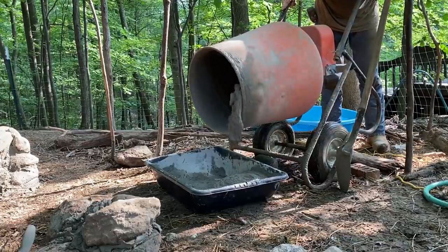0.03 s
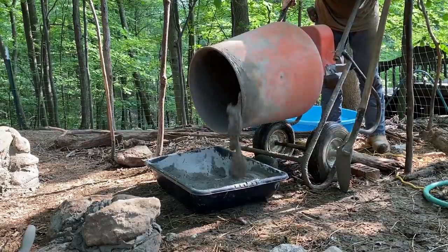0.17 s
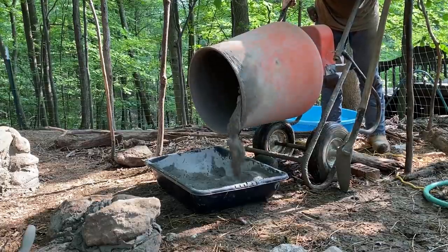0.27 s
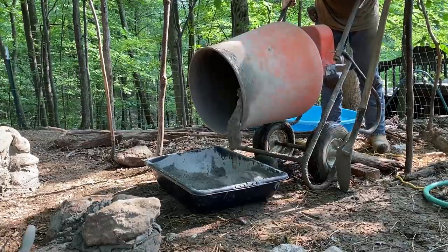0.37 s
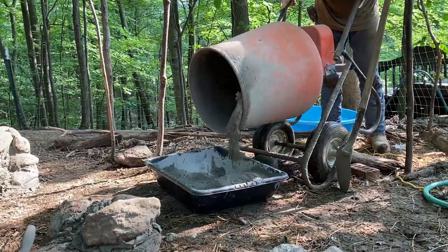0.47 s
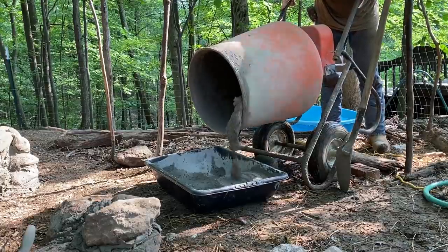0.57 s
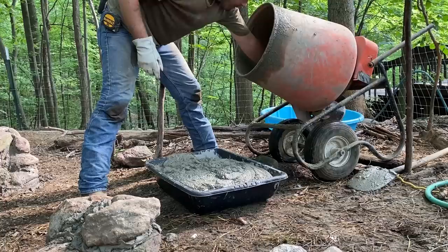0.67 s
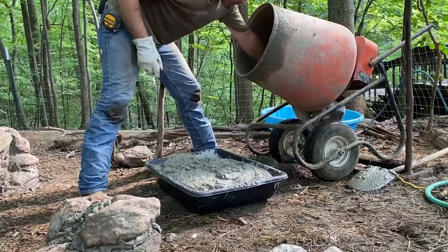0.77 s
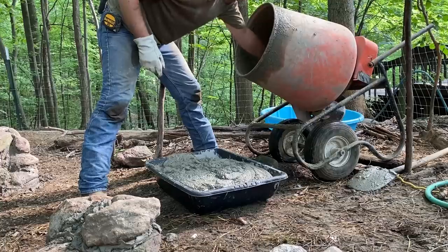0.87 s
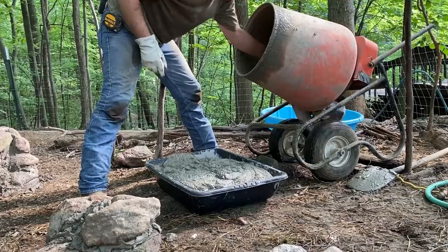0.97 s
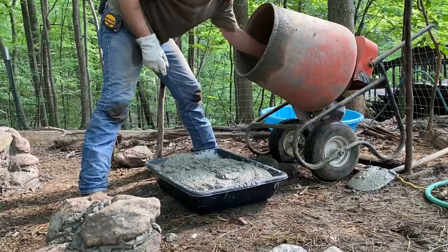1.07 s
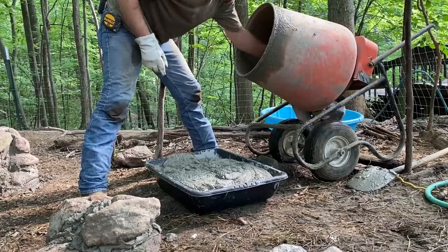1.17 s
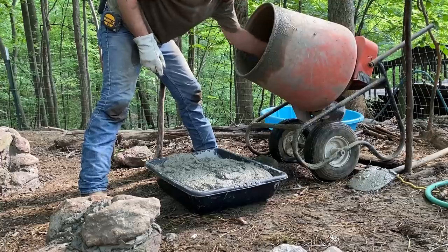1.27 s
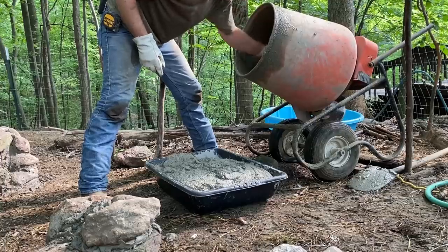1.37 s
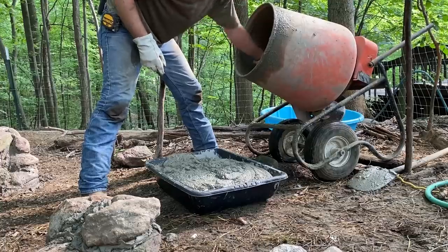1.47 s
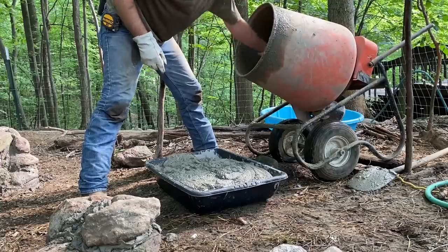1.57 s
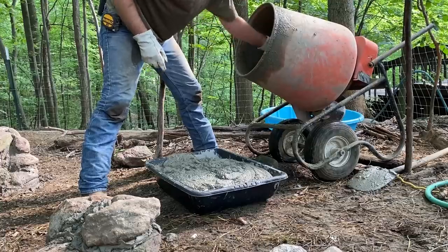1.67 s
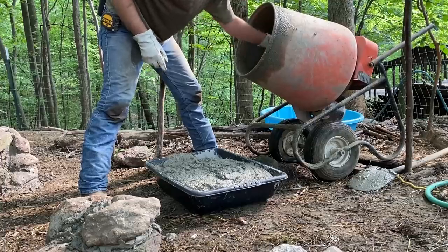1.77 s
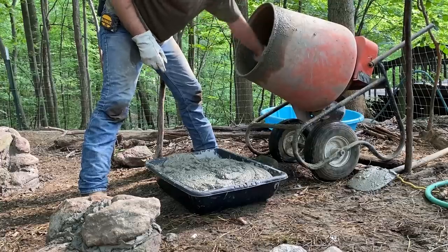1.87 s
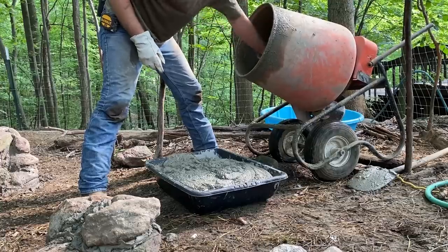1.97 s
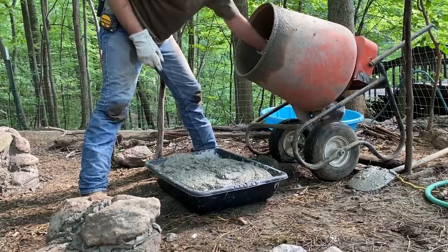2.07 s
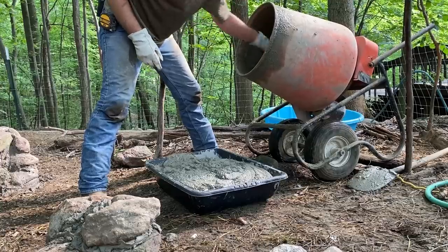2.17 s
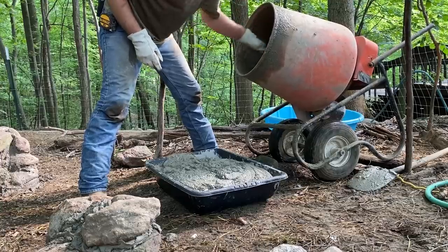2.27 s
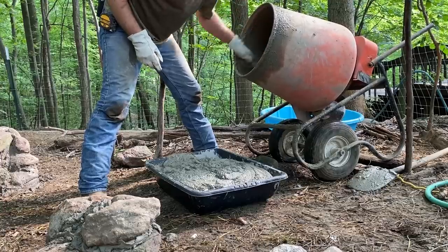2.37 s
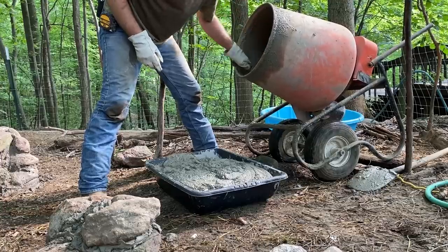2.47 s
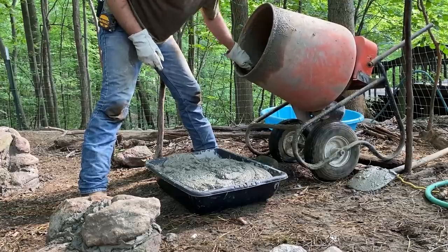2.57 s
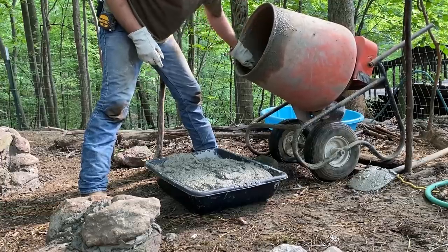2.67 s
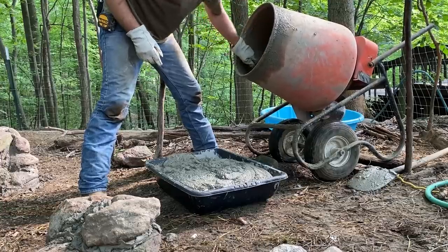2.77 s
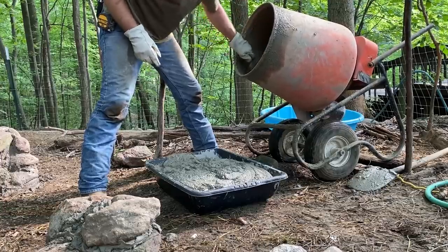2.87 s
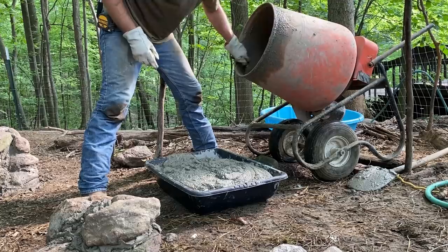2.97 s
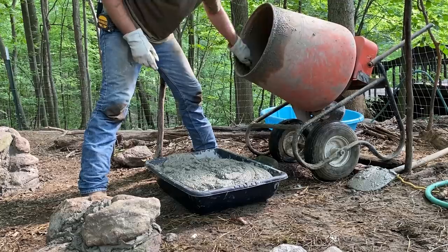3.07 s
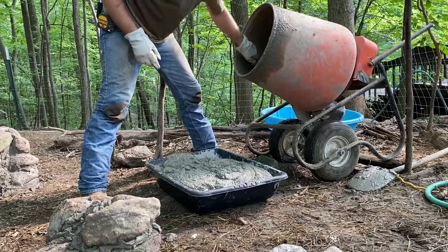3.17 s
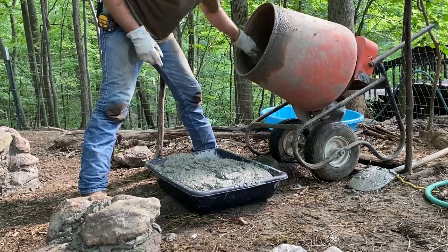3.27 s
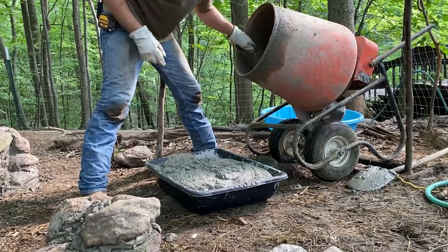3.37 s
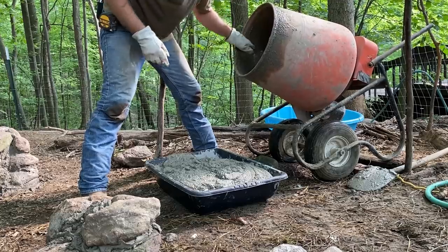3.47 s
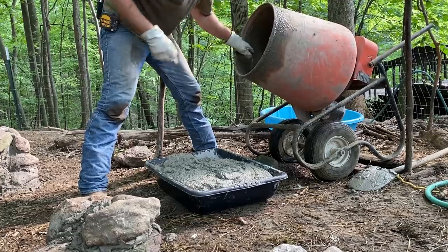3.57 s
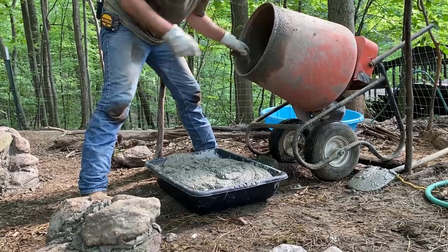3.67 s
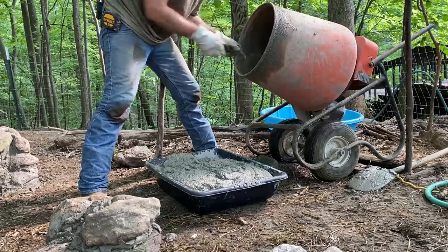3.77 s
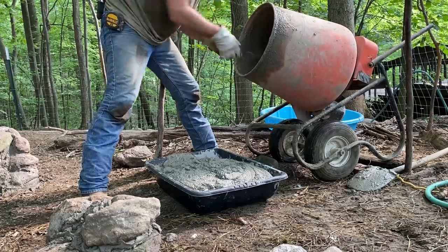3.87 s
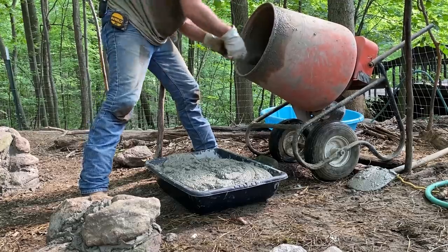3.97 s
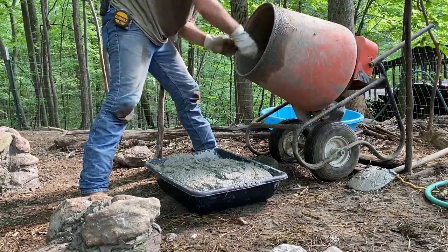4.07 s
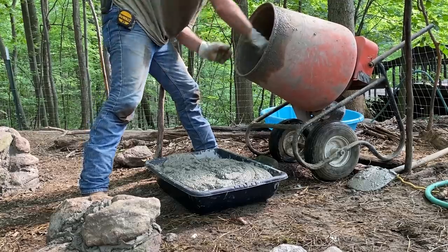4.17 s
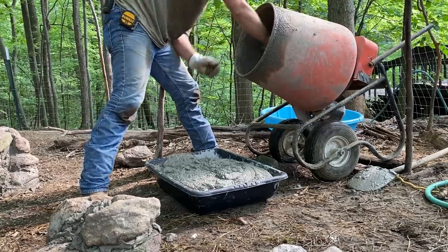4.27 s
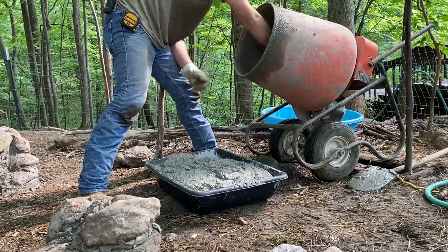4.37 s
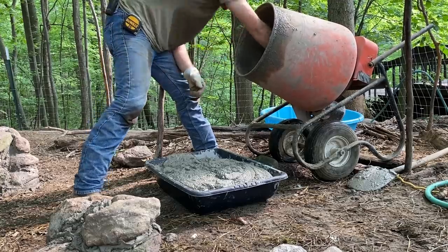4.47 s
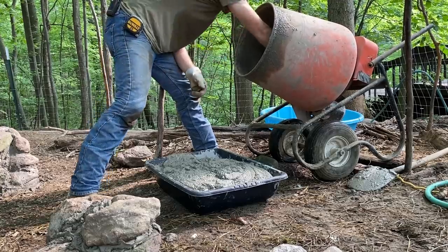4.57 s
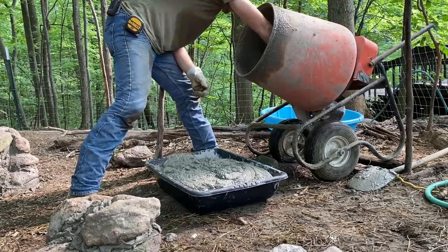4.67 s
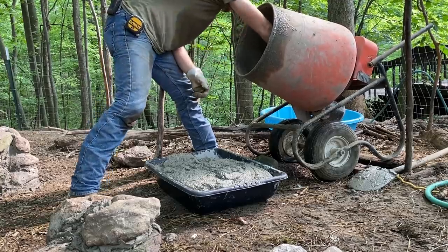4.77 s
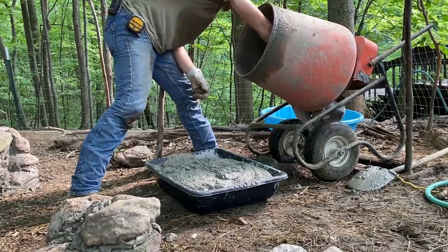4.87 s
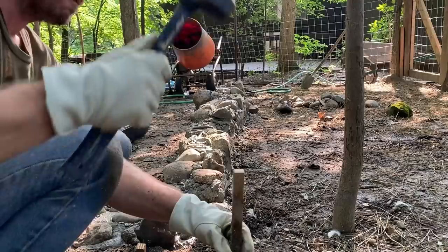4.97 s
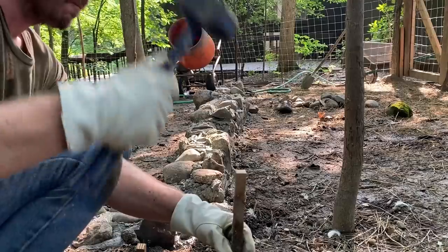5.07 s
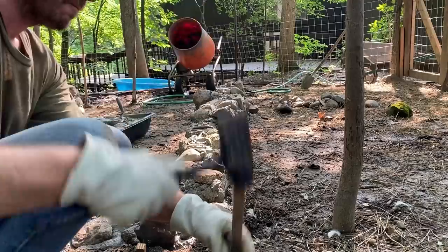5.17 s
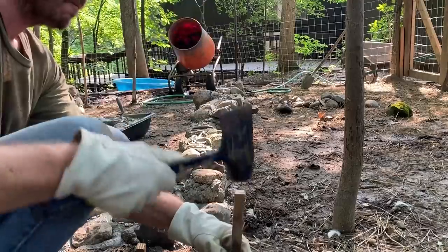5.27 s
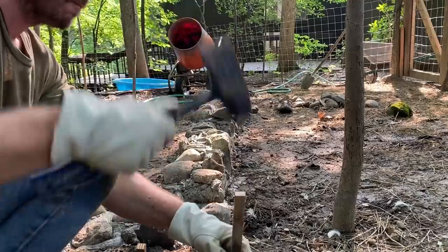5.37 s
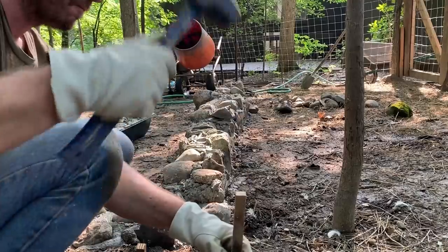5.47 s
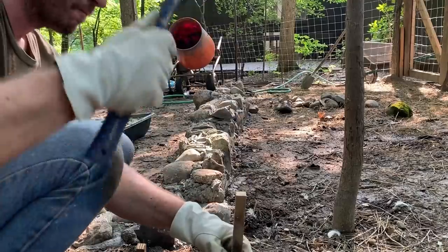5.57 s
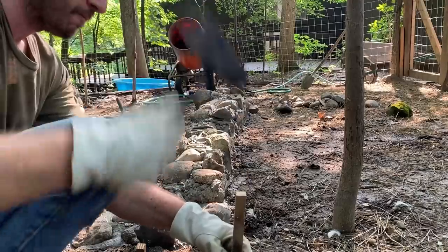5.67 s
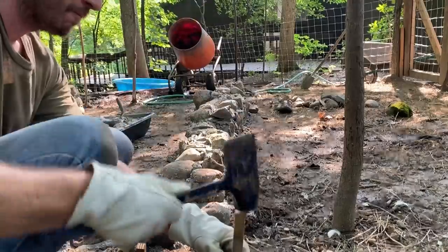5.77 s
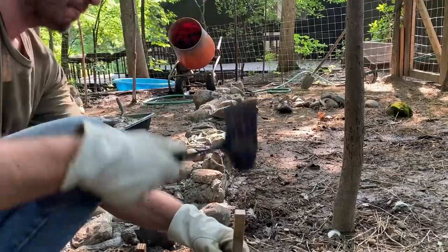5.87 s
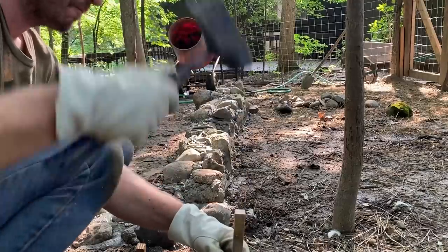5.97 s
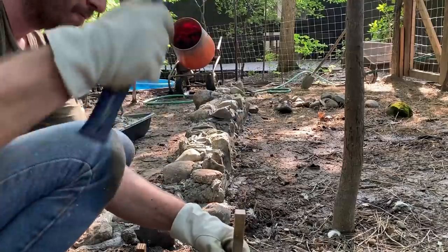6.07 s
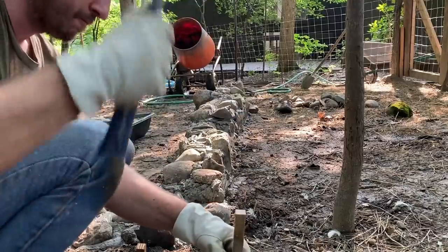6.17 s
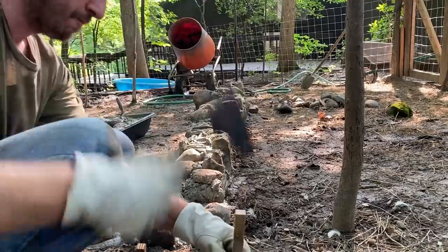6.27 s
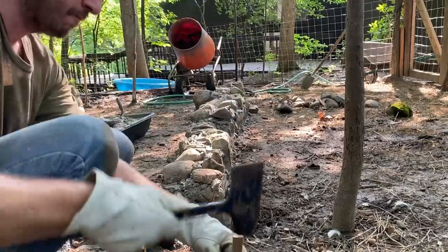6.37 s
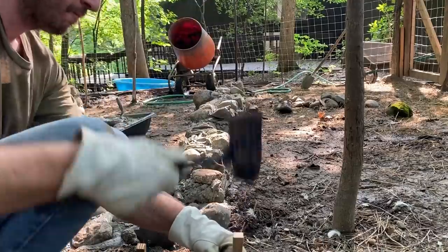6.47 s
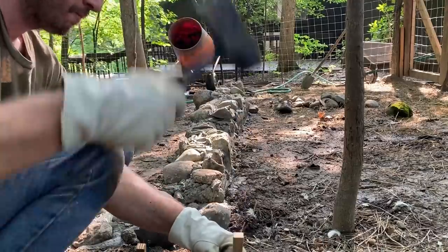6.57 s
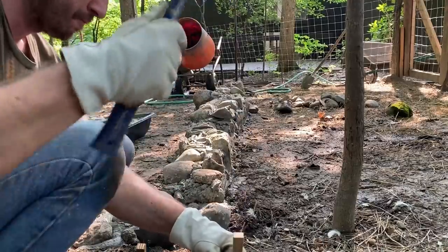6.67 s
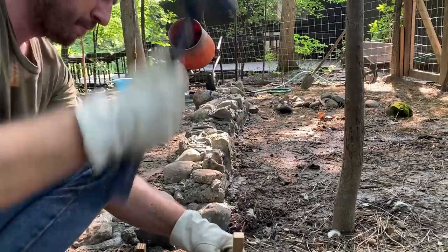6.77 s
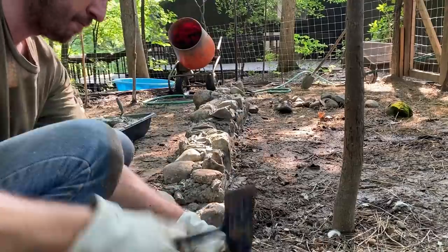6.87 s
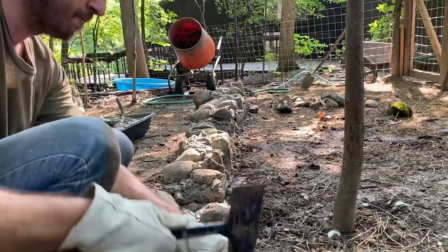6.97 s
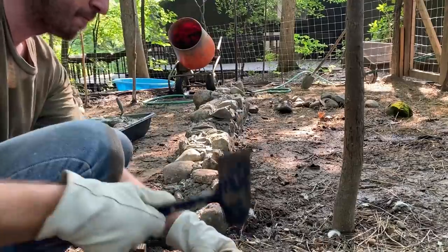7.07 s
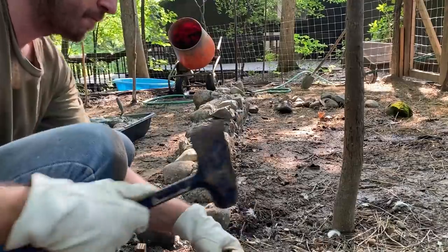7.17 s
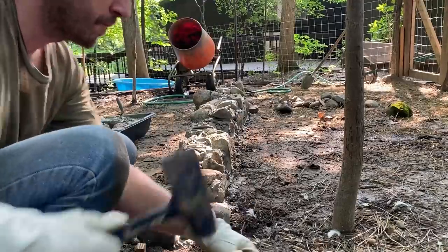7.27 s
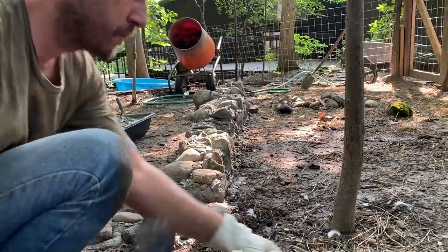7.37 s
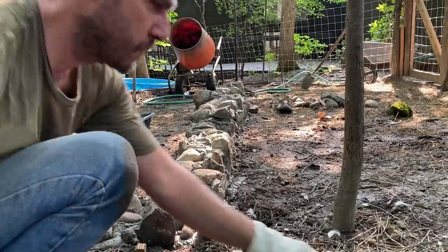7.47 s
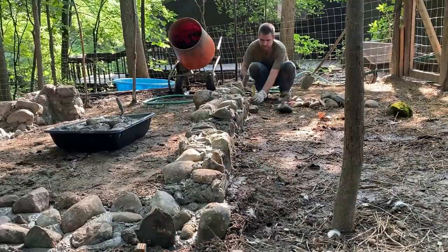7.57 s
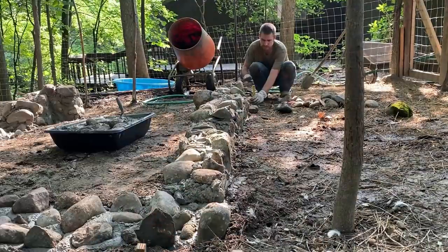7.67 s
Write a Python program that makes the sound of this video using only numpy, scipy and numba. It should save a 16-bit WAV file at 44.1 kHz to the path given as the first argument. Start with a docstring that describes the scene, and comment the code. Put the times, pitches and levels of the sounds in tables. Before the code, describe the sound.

Outdoors, a small mixer rattles briefly and cuts out, gritty hand scrapes echo in its drum, then four sharp close mallet blows drive a stake.

```python
"""In a wood, a small electric cement mixer hums and churns wet mortar, squeaks once and falls silent.
A gloved hand scrapes the gritty rest out of the steel drum, which rings hollow.
Then, close by and over an airy hiss, a mallet drives a wooden stake into the soil with four blows.
The hum and the squeak are sums of sines, the mortar, the glove and the air are shaped noise and clicks,
and the drum and the stake are sets of dying resonances."""
import sys
import numpy as np
from scipy import signal
from scipy.fft import rfft, irfft, next_fast_len
from scipy.io import wavfile
from numba import njit

SR = 44100
rng = np.random.default_rng(int(sys.argv[2]) if len(sys.argv) > 2 else 0)


def unload_audio(sound):
    """Save the sound as a 16-bit wav file, at the path given as the first command line argument."""
    columns = np.transpose(np.atleast_2d(sound))
    # keep every value between -1 and 1, then stretch to whole-number steps
    steps = np.round(np.clip(columns, -1, 1) * 32767)
    wavfile.write(sys.argv[1], SR, steps.astype(np.int16))


N = 340893
TIME = np.arange(N) / SR  # seconds

# Levels in all tables are relative: each is one stage on the way to the final loudness.
# far outdoor rumble: pitch_hz, level_db_per_hz
RUMBLE_SPECTRUM = [(20, -31), (35, -18.5), (55, -5.5), (95, 1.5), (125, -5), (190, -11.5), (250, -16),
                   (400, -26.5), (1000, -85.5), (4000, -69)]
# hiss of the air by the mixer: pitch_hz, level_db_per_hz
STILL_AIR_SPECTRUM = [(100, 21), (400, 11.5), (1000, 3), (3500, 0.5), (7000, -5), (10000, -16),
                      (16000, -39)]
# hiss of the air by the stake: pitch_hz, level_db_per_hz
OPEN_AIR_SPECTRUM = [(100, 9), (300, 5.5), (600, 7), (1200, 1.5), (3500, -0.5), (7000, -5), (9000, -11),
                     (12000, -14.5), (16000, -30)]
MOVE_S = 4.99  # the listener moves to the stake

# tones of the motor hum: multiple of HUM_HZ, level_db
HUM_TONES = [(1, 0), (2, -15.5), (3, -27), (4, -30)]
# load on the motor, as the level of its lowest tone: time_s, level_db
MOTOR_LOAD = [(0.0, -35.5), (0.13, -35.5), (0.358, -39.5), (0.628, -30), (0.71, -33.5)]
HUM_HZ, STOP_S = 120, 0.723  # the motor stops at STOP_S
# the overtones feel only a share of the load's swing around this level
OVERTONE_DB, OVERTONES_FOLLOW = -34.5, 0.32

# tumbling wet mortar: pitch_hz, level_db_per_hz
CHURN_SPECTRUM = [(40, -14), (90, 7), (260, 12), (400, 8), (560, -0.5), (830, 8), (1100, -3.5), (2400, -13),
                  (5000, -20), (9000, -22), (16000, -28)]
# the loose drum jolts on its gear: start_s, level_db, t60_s (time to die away by 60 dB)
JOLTS = [(.028, -42.5, 0.1), (0.151, -43, 0.075), (0.253, -49.5, 0.078), (.351, -48.5, 0.38),
         (0.457, -47.5, 0.15), (0.494, -46, 0.067), (0.695, -43, 0.091), (0.723, -46.5, 0.11),
         (0.821, -59.5, 0.22)]
# small stones tick against the wall: start_s, level_db
STONE_TICKS = [(.406, -47), (0.606, -48.5), (.722, -44)]
CHURN_DB = -48  # steady slide of the mortar
# mortar slumps after a jolt: level and length (a factor) are set against the jolt's own
SLUMP_DB, SLUMP_RISE_S, SLUMP_LASTS = 5.5, 0.012, 1.593
RATTLE_BAND_HZ = (630, 6000)
RATTLE_RING_HZ, RATTLE_RING_DB = (2480, 4480), -15.5  # the gear's two ringing bands
TICK_T60_S, TICK_ABOVE_HZ = 0.026, 3100
CLUNK_DB, CLUNK_HZ, CLUNK_T60_S = -53, 680, 0.2  # the sudden stop leaves the drum humming

# partial tones of the squeak: pitch_hz, level_db
SQUEAK_PARTIALS = [(3110, -3), (3020, -4), (2950, -11), (6176, -18.5), (6260, -7.5), (6210, -16),
                   (8960, -17.5), (12200, -22), (15300, -20)]
SQUEAK_S, SQUEAK_DB = 0.056, -31
SQUEAK_ATTACK_S, SQUEAK_HOLD_S, SQUEAK_RELEASE_S = 0.028, 0.014, 0.0072
SQUEAK_RING_DB, SQUEAK_T60_S = -14, 0.3  # the metal rings on

# sand on steel: pitch_hz, level_db_per_hz
GRIT_SPECTRUM = [(60, -33), (125, -3.5), (200, -18.5), (330, 4.5), (520, -10), (660, 3.5), (870, -0.5),
                 (1200, -1.5), (2200, -5), (4000, -13.5), (7000, -9), (10000, -8), (16000, -14.5)]
# the glove lands, drags lightly, swells to one push and lifts:
# land_s, lift_s, drag_db, push_s, push_half_length_s, push_db
GLOVE_STROKES = [(1.272, 1.65, -57, 1.476, .05, -35.5), (1.877, 1.942, -43, 1.912, 0.024, -43.5),
                 (2.4, 2.66, -50.5, 2.488, 0.043, -39), (2.934, 3.22, -54, 3.0675, 0.073, -42.5),
                 (4.519, 4.74, -54, 4.665, 0.029, -40), (4.829, 4.995, -57.5, 4.848, 0.018, -45)]
# faint, airy brushes of the glove over sand: start_s, end_s, level_db
GLOVE_BRUSHES = [(2.037, 2.11, -65), (2.768, 2.9, -68.5), (3.853, 4.188, -69.5), (4.79, 4.835, -60)]
LAND_S, LIFT_S = 0.0013, 0.023  # how long landing and lifting take
PUSH_SQUARENESS = 2.34  # exponent of the push's bell shape
# treble edge of the rasp at a firm push, and its power law with force
BRIGHT_HZ, BRIGHT_AT_DB, BRIGHT_FOLLOWS = 5450, -34.5, 0.29
# the hollow under the glove: pitch from landing to lifting, and its blur
HOLLOW_DB, HOLLOW_HZ, HOLLOW_WIDTH_HZ = -7, (1020, 600), 75
FLEX_DB, FLEX_HZ, FLEX_LAG_S = -13, (133, 610), 0.0091  # the wall booms just after the pressure
BRUSH_RISE, BRUSH_FALL, BRUSH_HZ = 0.075, 0.76, 7700  # shares of the length; treble edge
JERK_DB, JERKS_PER_S = 3, 110

# the hand knocks on the drum wall: start_s, level_db, centre_hz, t60_s
HAND_KNOCKS = [(1.27, -51, 570, 0.1), (1.333, -58, 900, .1), (1.377, -49.5, 970, 0.23),
               (1.878, -32, 1130, 0.034), (2.403, -33, 840, .06), (2.517, -42.5, 844, 0.21),
               (2.696, -53.5, 1000, 0.066), (2.941, -56.5, 960, .07), (2.975, -50, 1910, 0.3),
               (4.522, -44.5, 715, 0.046), (4.62, -45, 1500, .08), (4.638, -39.5, 1600, .12),
               (4.842, -42.5, 760, 0.31)]
# lumps of mortar drop in the drum: start_s, level_db, centre_hz, t60_s
MORTAR_LUMPS = [(1.919, -30, 290, 0.048), (2.47, -46.5, 145, 0.33), (3.019, -47.5, 300, 0.54),
                (4.647, -34, 400, 0.036), (4.839, -49.5, 170, .4)]
KNOCK_RISE_S, LUMP_RISE_S = 0.002, 0.0068

# hollow tones of the steel drum: pitch_hz, level_db, t60_s
DRUM_MODES = [(125, 8.5, 0.18), (223, 3, 0.75), (315, -0.5, 0.323), (436, 1, 0.43), (607.3, 1, 0.27),
              (680, -0.5, 0.44), (747, -15, 0.33), (827, -2, 0.082), (900, -5, 0.3), (1131, -4, 0.17),
              (1570, -3, 0.38), (1636, -5, 0.1584), (1984, -7.5, 0.14), (2444, -4, .15)]
# how far the mixer and the glove lean to one side: pitch_hz, left_minus_right_db
MIXER_BALANCE_TABLE = [(100, -1.2), (700, -2.5), (1300, -2.5), (2400, 0.3), (15000, -1)]

# mallet blows: start_s, knock_db, ring_hz, ring_db, crack_db, thud_db
MALLET_BLOWS = [(5.206, -29.5, 692, -19, -26, -39.5), (5.765, -29, 2440, -31, -17, -29.5),
                (6.3375, -28, 1298, -13.5, -23, -29.5), (6.9078, -27, 2250, -12, -15, -28.5)]
# tones of the wooden stake, shifted a little by chance at each blow: pitch_hz, level_db, t60_s
STAKE_MODES = [(178, -10.5, 0.099), (403, -4.5, 0.024), (699, 2.5, 0.024), (880, -14, 0.011),
               (1150, 5, 0.026), (1580, -2, 0.016), (1810, 3, 0.023), (2290, 3.5, 0.02), (3470, 4.5, 0.011),
               (4370, 4.5, 0.0079), (7480, 0, 0.0076)]
# splintery crack of the stake head: pitch_hz, level_db_per_hz
CRACK_SPECTRUM = [(200, -0.5), (800, -1.5), (3000, -2.5), (6500, -5.5), (9000, -6.5), (12000, -20),
                  (16000, -16)]
# the ground's deep swell at a firm blow; a harder one peaks sooner
THUD_DELAY_S, THUD_AT_DB, THUD_HASTENS = 0.032, -30, 0.41
EARTH_DB, EARTH_HZ, EARTH_T60_S = -28, (300, 1700), 0.7  # dull echo of a blow from the ground

# lead of the left side for the stake alone: pitch_hz, turn_rad
STAKE_LEAD = [(0, 0.38), (700, 0.57), (5000, 0.8), (6200, 0.054)]
# lead of the left microphone for all sound, below zero where it is late: pitch_hz, turn_rad
MIC_LEAD = [(7000, 0), (8200, -3.4), (16000, -12.5)]
CUTOFF_HZ = 15900


def from_db(db):
    """Turns decibels into a plain factor."""
    return 10 ** (np.asarray(db) / 20)


def rms_one(x):
    """Scales a sound to an average strength (rms) of 1."""
    return x / np.sqrt(np.mean(x ** 2) + 1e-20)


def ramp(start, length):
    """A smooth step from 0 to 1."""
    u = np.clip((TIME - start) / length, 0, 1)
    return u * u * (3 - 2 * u)


def dying(start, t60):
    """An envelope that jumps to 1 and dies away by 60 dB in t60 seconds."""
    return (TIME >= start) * np.exp(-np.log(1000) * np.clip((TIME - start) / t60, 0, 10))


def held(start, end, rise, fall):
    """An envelope that rises, holds and falls."""
    return ramp(start, rise) * (1 - ramp(end - fall, fall))


def drift(rate):
    """Random wavering: straight lines between chance values of spread 1, rate of them per second."""
    knots = rng.standard_normal(N // 20)
    return np.interp(TIME * rate, np.arange(len(knots)), knots)


def coloured(x, spectrum):
    """Gives a noise its spectrum; rms 1."""
    hz, db = np.transpose(spectrum)
    size = next_fast_len(N)
    bins = np.maximum(np.fft.rfftfreq(size, 1 / SR), 1)
    gain = from_db(np.interp(np.log(bins), np.log(hz), db))
    return rms_one(irfft(rfft(x, size) * gain, size)[..., :N])


def filtered(x, hz, kind):
    """Keeps the low, high or middle part of a sound with a gentle filter."""
    return signal.sosfilt(signal.butter(2, hz, kind, fs=SR, output="sos"), x + 1e-18)


def noise(apart):
    """Stereo white noise; apart is the share that each side has to itself."""
    white, apart = rng.standard_normal((3, N)), np.clip(apart, 0, 1)
    return np.sqrt(1 - apart) * white[2] + np.sqrt(apart) * white[:2]


def grains(per_s, spread_db):
    """Stereo clicks at random moments, a few much larger than the rest; treble scatters to either side."""
    sizes = from_db(spread_db * np.minimum(rng.exponential(1, N), 4)) * rng.choice([-1, 1], N)
    clicks = rms_one(sizes * (rng.random(N) < per_s / SR))
    side = filtered(clicks * rng.choice([-1, 1], N), [2800, 8500], "band")
    return clicks + from_db(-2) * side * [[1], [-1]]


def ring(x, hz, t60):
    """A unit click sets a sine of height 1 ringing."""
    r, w = np.exp(-np.log(1000) / (t60 * SR)), 2 * np.pi * hz / SR
    return signal.lfilter([0, np.sin(w)], [1, -2 * r * np.cos(w), r * r], x + 1e-18)


def resonance(x, hz, t60):
    """A resonance with gain 1 on top."""
    r, w = np.exp(-np.log(1000) / (t60 * SR)), 2 * np.pi * hz / SR
    feed = np.array([1, 0, -1]) * (1 - r * r) / 2
    return signal.lfilter(feed, [1, -2 * r * np.cos(w), r * r], x + 1e-18)


def echoes(x, delay, t60, apart):
    """Dense reflections that die away, with unit energy."""
    tail = (noise(apart) * dying(delay, t60))[:, :SR // 2]
    tail = tail / np.sqrt(np.sum(tail ** 2) / 2)
    return signal.fftconvolve(np.atleast_2d(x), tail, axes=1)[:, :N]


def leading(x, phases):
    """Turns the phase of the left side against the right."""
    size = next_fast_len(N + SR // 10)
    turn = np.interp(np.fft.rfftfreq(size, 1 / SR), *np.transpose(phases))
    return np.array([irfft(rfft(x[0], size) * np.exp(1j * turn), size)[:N], x[1]])


def balanced(x, balance):
    """Leans a sound to one side, by a different amount at each frequency."""
    hz, db = np.transpose(balance)
    size = next_fast_len(N + SR // 10)
    lean = np.interp(np.fft.rfftfreq(size, 1 / SR), hz, db)
    return irfft(rfft(x, size) * from_db(np.array([lean, -lean]) / 2), size)[:, :N]


def shifting(x, rate, share):
    """A close reflection whose path keeps changing colours the sound in moving patches."""
    path_s = 0.0007 * from_db(4 * drift(rate))
    reflection = np.array([np.interp(TIME - path_s, TIME, side) for side in x])
    return (x - share * reflection) / np.sqrt(1 + share ** 2)


@njit
def dulled(x, pole):
    """A one-pole low-pass whose edge moves."""
    out = np.zeros_like(x)
    for i in range(1, x.shape[1]):
        for side in range(2):
            out[side, i] = pole[i] * out[side, i - 1] + (1 - pole[i]) * x[side, i]
    return out


def outdoors(moved):
    """A far rumble and a smooth hiss of air, louder by the stake, where a faint hollow drone fades away."""
    rumble = coloured(noise(apart=0.033), RUMBLE_SPECTRUM) * from_db(-59.5 + 0.79 * moved)
    still_air = from_db(-67.5) * coloured(noise(apart=1.0), STILL_AIR_SPECTRUM)
    open_air = from_db(-59) * coloured(noise(apart=0.83), OPEN_AIR_SPECTRUM)
    drone = from_db(-67) * rms_one(filtered(noise(apart=0.6), [590, 700], "band"))
    drone = drone * (1 - ramp(5.3, 1.1))
    return rumble + (1 - moved) * still_air + moved * (open_air + drone)


def motor():
    """The motor shakes the frame at twice the mains rate; the overtones waver with the load."""
    load_db = np.interp(TIME, *np.transpose(MOTOR_LOAD))
    overtone_db = OVERTONE_DB + OVERTONES_FOLLOW * (load_db - OVERTONE_DB)
    phase = 2 * np.pi * HUM_HZ * TIME + 0.1 * drift(30)
    hum = 0
    for multiple, db in HUM_TONES:
        base_db = load_db if multiple == 1 else overtone_db
        # higher tones waver more, in level and in phase
        level = from_db(db + base_db + 2.2 * np.log(multiple) * drift(22))
        hum = hum + level * np.sin(multiple * phase + 0.8 * np.log(multiple) * drift(25))
    return np.sqrt(2) * hum * (1 - ramp(STOP_S, 0.0014))


def churning():
    """Wet sand slides round the turning drum; each jolt rattles the gear and makes the mortar slump."""
    jolts, slumps = np.zeros((2, N))
    for at, db, t60 in JOLTS:
        jolts += from_db(db) * ramp(at, 0.0027) * dying(at, t60)
        slumps += from_db(db + SLUMP_DB) * ramp(at, SLUMP_RISE_S) * dying(at, SLUMP_LASTS * t60)

    slide = coloured(grains(per_s=2000, spread_db=2.5), CHURN_SPECTRUM)
    slide = slide * np.hypot(from_db(CHURN_DB), slumps) * from_db(2.1 * drift(44.3))

    clatter = coloured(grains(per_s=4500, spread_db=4.5), GRIT_SPECTRUM)
    clatter = rms_one(filtered(clatter, RATTLE_BAND_HZ, "band"))
    gear = 0
    for hz in RATTLE_RING_HZ:
        band = rms_one(resonance(clatter[0], hz, 26 / hz))
        gear = gear + band * from_db(RATTLE_RING_DB + 3 * drift(12))

    tick_level = sum(from_db(db) * dying(at, TICK_T60_S) for at, db in STONE_TICKS)
    ticks = tick_level * filtered(noise(apart=0.3), TICK_ABOVE_HZ, "high")
    clunk_level = from_db(CLUNK_DB) * ramp(STOP_S, 0.004) * dying(STOP_S, CLUNK_T60_S)
    clunk = clunk_level * np.sin(2 * np.pi * CLUNK_HZ * TIME)

    # small wet pockets pop, each ringing for a few cycles
    pops = 0
    for hz in np.geomspace(900, 5200, 10):
        bursts = (rng.random(N) < 45 / SR) * rng.standard_normal(N)
        pops = pops + ring(bursts, hz, 26 / hz)
    mortar = (slide + from_db(-60.5) * rms_one(pops)) * (1 - ramp(STOP_S, 0.0042))
    return mortar + jolts * (clatter + gear) + ticks + clunk


def squeak():
    """A brief, rough stick-slip squeal that bends up in pitch; its close partials beat."""
    clock = np.cumsum(1 - 0.022 * (1 - ramp(SQUEAK_S, 0.025))) / SR  # runs slow at first: lower pitch
    jitter_s = 1.6e-5 + 2.6e-5 * (1 - ramp(0.1, 0.015))  # roughest at first
    tones = 0
    for hz, db in SQUEAK_PARTIALS:
        tones = tones + from_db(db) * np.sin(2 * np.pi * hz * (clock + jitter_s * drift(650)))
    let_go = SQUEAK_S + SQUEAK_ATTACK_S + SQUEAK_HOLD_S
    free = ramp(let_go, SQUEAK_RELEASE_S)
    driven = ramp(SQUEAK_S, SQUEAK_ATTACK_S) * (1 - free)
    ringing = from_db(SQUEAK_RING_DB) * free * dying(let_go, SQUEAK_T60_S)
    direct = tones * (driven + ringing) * from_db(SQUEAK_DB)
    return direct + from_db(-13) * echoes(direct, delay=0.004, t60=0.3, apart=0.8)


def thumps(rows, rise):
    """The hand or a lump of mortar meets the wall with a soft thump of band-limited noise."""
    white, out = rng.standard_normal(N), 0
    for at, db, hz, t60 in rows:
        push = ramp(at, rise) * np.where(TIME < at + rise, 1, dying(at + rise, t60))
        out = out + from_db(db) * push * rms_one(filtered(white, [hz / 1.75, hz * 1.227], "band"))
    return out


def scraping():
    """Sand grinds under the glove in uneven jerks; a stroke brightens with force, faint brushes are airy."""
    grit = shifting(grains(per_s=6000, spread_db=3.6), rate=14, share=0.45)
    grit = coloured(grit, GRIT_SPECTRUM)
    flutter = rms_one(filtered(rng.standard_normal(N), HOLLOW_WIDTH_HZ, "low"))
    force, hollow = np.zeros((2, N))
    for land, lift, drag_db, push_at, half_length, push_db in GLOVE_STROKES:
        distance = np.minimum(np.abs(TIME - push_at) / half_length, 10)
        push = from_db(push_db) * np.exp(-distance ** PUSH_SQUARENESS)
        stroke = held(land, lift, LAND_S, LIFT_S) * (from_db(drag_db) + push)
        force += stroke
        # the hollow between glove and wall sinks in pitch as mortar piles up
        hollow_hz = np.interp(TIME, [land, lift], HOLLOW_HZ)
        hollow += stroke * flutter * np.cos(2 * np.pi * np.cumsum(hollow_hz) / SR)
    # within a stroke, the light drag is duller than the push
    edge_hz = BRIGHT_HZ * (force / from_db(BRIGHT_AT_DB) + 0.01) ** BRIGHT_FOLLOWS
    rasp = force * dulled(grit, np.exp(-2 * np.pi * edge_hz / SR)) + from_db(HOLLOW_DB) * hollow

    late_force = np.interp(TIME - FLEX_LAG_S, TIME, force)
    flex = late_force * rms_one(filtered(rng.standard_normal(N), FLEX_HZ, "band"))

    touch = 0
    for start, end, db in GLOVE_BRUSHES:
        length = end - start
        touch = touch + from_db(db) * held(start, end, BRUSH_RISE * length, BRUSH_FALL * length)
    brush = touch * dulled(grit, np.full(N, np.exp(-2 * np.pi * BRUSH_HZ / SR)))
    return (rasp + brush) * from_db(JERK_DB * drift(JERKS_PER_S)) + from_db(FLEX_DB) * flex


def drum(x):
    """The steel drum adds its hollow modes and the quick echoes of its inside; the wood returns a faint tail."""
    modes = sum(from_db(db) * resonance(x, hz, t60) for hz, db, t60 in DRUM_MODES)
    inside = echoes(filtered(x, 3400, "low"), delay=0.00081, t60=0.14, apart=0.8)
    trees = echoes(filtered(x, 1500, "high"), delay=0.01, t60=0.16, apart=0.95)
    return from_db(-1) * x + from_db(-1) * modes + from_db(-6.5) * inside + from_db(-9) * trees


def mallet():
    """Each blow knocks and cracks the stake, which the soil damps at once; a slow thud follows in the ground."""
    knocks, rings, cracks, thuds, tails, rolls = np.zeros((6, N))
    for at, knock_db, ring_hz, ring_db, crack_db, thud_db in MALLET_BLOWS:
        click, age = np.zeros(N), TIME - at
        click[round(at * SR)] = 1
        swell = ramp(at, 0.00073)  # the contact takes a moment to build
        wood = 0
        for k, (hz, db, t60) in enumerate(STAKE_MODES):
            level = from_db(db + rng.normal()) * (-1) ** k
            wood = wood + level * ring(click, hz * (1 + 0.022 * rng.normal()), t60)
        knocks += from_db(knock_db) * swell * wood
        # the strongest ring depends on the spot that is hit, and lasts while the stake slips
        slip = ramp(at, 0.0045) * (1 - ramp(at + 0.0023, 0.0034))
        rings += from_db(ring_db) * slip * np.sin(2 * np.pi * ring_hz * age)
        cracks += from_db(crack_db) * swell * dying(at, 0.016)
        # the soil carries its higher tones first and the deep swell last
        shove = dying(at, 0.06) * np.sin(2 * np.pi * 215 * age)
        thud_age = age - THUD_DELAY_S * from_db(THUD_HASTENS * (THUD_AT_DB - thud_db))
        deep = np.exp(-(thud_age / 0.016) ** 2) * np.cos(2 * np.pi * 78 * thud_age)
        thuds += from_db(thud_db) * ramp(at, 0.0075) * (shove + deep)
        # scattered back by the trees
        tails += ramp(at, 0.043) * dying(at, 0.39) * (from_db(crack_db) + from_db(ring_db - 33))
        rolls += from_db(knock_db) * ramp(at, 0.015) * dying(at, EARTH_T60_S)
    earth = from_db(EARTH_DB) * rolls * rms_one(filtered(noise(apart=0.45), EARTH_HZ, "band"))
    hit = knocks + rings + cracks * coloured(noise(apart=0.051), CRACK_SPECTRUM)
    near = echoes(hit, delay=0.0074, t60=0.037, apart=1.0)  # off the ground and the kneeling body
    trees = tails * rms_one(filtered(noise(apart=0.91), [700, 5500], "band"))
    stake = leading(hit + from_db(-17) * near, STAKE_LEAD)
    return stake + thuds + earth + from_db(-32.5) * trees


def scene():
    """Adds air, mixer, glove and stake; mixer and stake both sound a little stronger on the right."""
    air = outdoors(ramp(MOVE_S, 0.0042)) * from_db([[-0.6], [0.6]])
    hand = scraping() + thumps(HAND_KNOCKS, KNOCK_RISE_S) + thumps(MORTAR_LUMPS, LUMP_RISE_S)
    mixer = motor() + squeak() + drum(churning() + hand)
    stake = mallet() * from_db([[-0.4], [0.4]])
    return air + balanced(mixer, MIXER_BALANCE_TABLE) + stake


def record(dry):
    """The top octave reaches the left microphone slightly late; the deepest bass and the very top are cut."""
    heard = filtered(leading(dry, MIC_LEAD), 30, "high")
    return signal.sosfilt(signal.ellip(10, 0.1, 80, CUTOFF_HZ, fs=SR, output="sos"), heard)


dry = scene()
out = record(dry)
unload_audio(out)
```